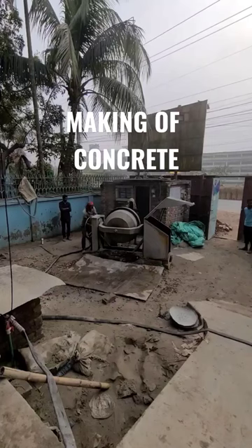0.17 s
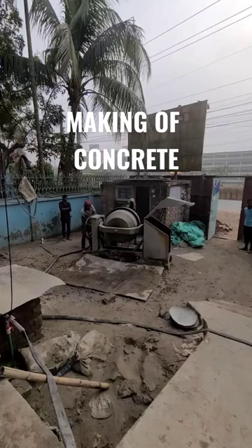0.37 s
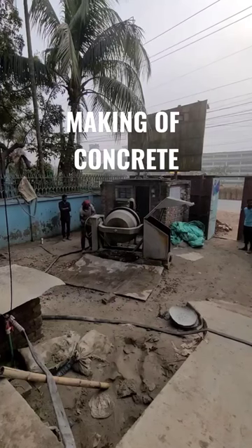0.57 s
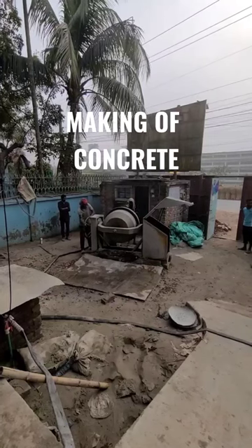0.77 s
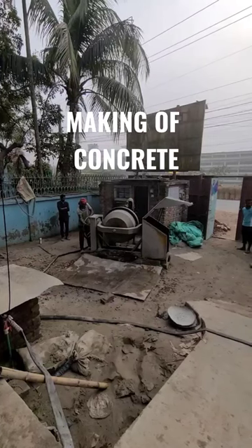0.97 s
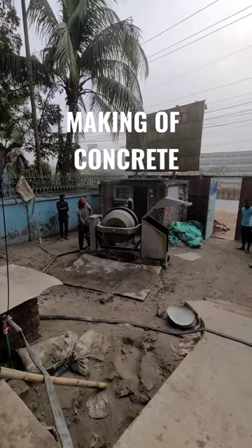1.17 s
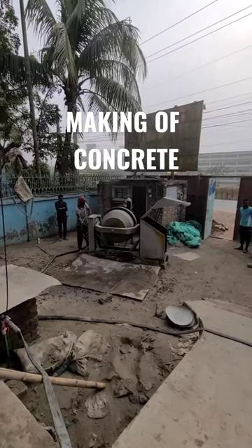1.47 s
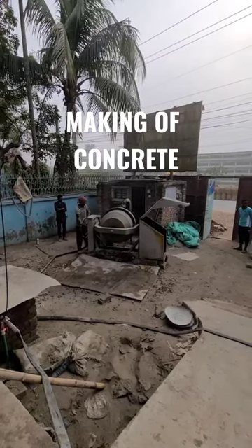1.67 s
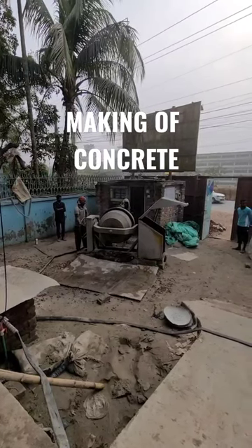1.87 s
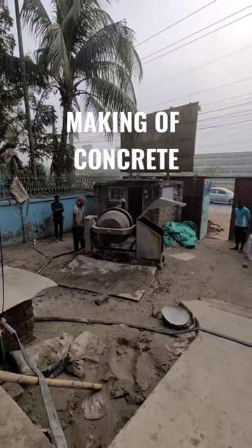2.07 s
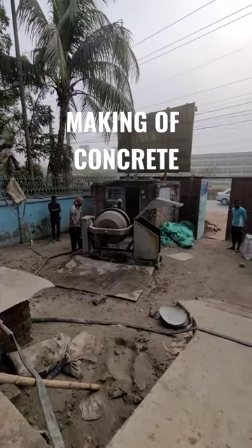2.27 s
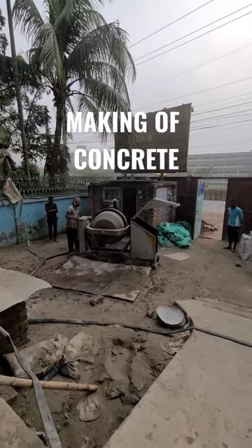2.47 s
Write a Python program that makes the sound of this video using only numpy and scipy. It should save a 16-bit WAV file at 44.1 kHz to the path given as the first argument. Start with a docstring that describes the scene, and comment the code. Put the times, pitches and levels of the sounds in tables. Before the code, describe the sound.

A drum concrete mixer rumbles and booms loudly, stones rattling and steel clanking over diesel hum

```python
"""A drum concrete mixer turns in an open yard: its wet load tumbles and makes the steel shell rumble and boom.
Filtered random impacts make the rumble, the rattle of stones and the hiss of sand; one wandering tone booms.
A slow single-cylinder diesel hums as a stack of unsteady tones. Clanks are noise ringing the modes of the steel,
and ticks of grit are short puffs of bright noise. Two close microphone ports pick it all up in stereo.
The sound starts abruptly after a short silence."""
import sys
import numpy as np
from scipy import signal
from scipy.fft import rfft, irfft, next_fast_len
from scipy.io import wavfile

SR = 44100
rng = np.random.default_rng(int(sys.argv[2]) if len(sys.argv) > 2 else 0)


def transcribe(signal):
    """Save signal, clipped to [-1, 1], as a 16-bit WAV file at the path in sys.argv[1]."""
    frames = np.atleast_2d(signal).T
    limited = np.clip(frames, -1, 1)
    pcm = np.round(limited * 32767).astype(np.int16)
    wavfile.write(sys.argv[1], SR, pcm)


N = 116424  # length in samples

# Engine tones that stand out. Each row: multiple of the engine cycle, average rms level in dB.
ENGINE_ORDERS = [(5, -38), (6, -27), (7, -28.5), (8, -33.5), (15, -31), (17, -27), (21, -34.5), (23, -28)]
# Strongest engine tone, 16 times the cycle. Each row: time in seconds, rms level in dB.
ENGINE_DRONE = [(0.18, -31), (0.34, -22.5), (0.79, -20.5), (0.92, -36), (1.08, -20), (1.43, -22),
                (1.5, -28.5), (1.9, -22), (1.96, -42), (2.33, -35), (2.43, -22.5), (2.64, -27.5)]
CYCLE_HZ = 11.63  # average engine cycles per second
ORDER_WAVER_DB, SPEED_WAVER = 2, 0.00398  # typical wavering: tone level in dB, speed as a share

# Low boom of the shell. Each row: time in seconds, rms level in dB.
BOOM_LEVEL = [(0.18, -17), (0.21, -35.5), (0.94, -20.5), (0.97, -37), (1.12, -20), (1.29, -35), (1.39, -28),
              (1.76, -33), (1.86, -16), (1.95, -33), (2.02, -25), (2.15, -26.5), (2.23, -14.5), (2.44, -33),
              (2.47, -24.5), (2.64, -27)]
BOOM_HZ, BOOM_WANDER = 137.5, 0.013  # average pitch; typical wander as a share of it

# Rumble of the tumbling load. Each row: time in seconds, level in dB before the trim,
# level of the upper part in dB (only its changes around the average count).
RUMBLE_LEVEL = [(0.18, -18.5, -5.5), (0.25, -17, -2), (0.27, -22, 2), (0.3, -16.5, -4), (0.55, -20.5, 0),
                (0.58, -28.5, 9.5), (0.62, -20, -2.5), (0.82, -24, 1), (0.84, -16.5, -6), (1.17, -24.5, 3),
                (1.41, -18.5, -2), (1.43, -23.5, 1.5), (1.66, -23.5, 1.5), (1.69, -17, -6.5),
                (1.78, -23, 2.5), (2.15, -21.5, -1.5), (2.19, -19, -3), (2.29, -26.5, 1.5),
                (2.56, -16, -5.5), (2.64, -21, 1.5)]
# Tone colour of the thuds. Each row: frequency in Hz, relative level in dB per Hz.
THUD_COLOUR = [(13, -52), (22, -22), (69, -6.5), (158, -7.5), (187, 0.5), (223, -11.5), (265, -8.5),
               (422, -10.5), (539, -24.5), (700, -25), (910, -35), (1540, -120)]
# Resonances of the drum shell. Each row: frequency in Hz, width in Hz, lift in dB over the plain thuds.
SHELL_MODES = [(78.5, 85, 4), (103, 10.2, 9), (198.5, 11, 5), (268, 16, -1), (298.6, 45, 6.5),
               (384.4, 28, 3.5), (424.7, 45, 9.5)]
RUMBLE_TRIM_DB, THUDS_PER_S = 4, 1500  # the rate is for each impact train
RUMBLE_SPLIT_HZ = (96, 290)  # the upper part's share grows from none to full between these

# Stones rattling in the drum. Each row: time in seconds, level in dB before the trim.
RATTLE_LEVEL = [(0.18, -22.5), (0.23, -24), (0.23, -22.5), (0.26, -23.5), (0.43, -22.5), (0.7, -23.5),
                (0.93, -24), (0.95, -24), (1.16, -26.5), (1.18, -22.5), (1.41, -23), (1.47, -27.5),
                (1.49, -22.5), (1.64, -26), (1.78, -19), (1.8, -23), (1.95, -25), (1.99, -21.5),
                (2.17, -23.5), (2.19, -19.5), (2.21, -24), (2.5, -23), (2.52, -30), (2.54, -20),
                (2.63, -22), (2.64, -33)]
# Treble of the rattle. Each row: time in seconds, level in dB (its changes against the rattle level count).
TREBLE_LEVEL = [(0.18, -34), (0.27, -32.5), (0.32, -32), (0.42, -30), (0.48, -38), (0.7, -35),
                (0.73, -39.5), (0.75, -33), (0.76, -34), (0.92, -31), (0.99, -37.5), (1.1, -34.5),
                (1.14, -40.5), (1.17, -33), (1.39, -35), (1.44, -35), (1.48, -33.5), (1.49, -31),
                (1.7, -36.5), (1.76, -30.5), (1.78, -34), (1.9, -37.5), (1.96, -33.5), (2.15, -38.5),
                (2.19, -31.5), (2.3, -38), (2.34, -36), (2.52, -35), (2.6, -31.5), (2.64, -31)]
# Tone colour of the stones. Each row: frequency in Hz, relative level in dB per Hz.
STONE_COLOUR = [(450, -20), (600, -3.5), (900, -4.5), (1300, -4), (1600, -10.5), (1950, -9), (2400, -14.5),
                (3050, -15.5), (3500, -19), (4500, -23), (6000, -26), (8500, -43)]
RATTLE_TRIM_DB, STONES_PER_S = 1.33, 4000  # the rate is for each impact train
RATTLE_SPLIT_HZ = (1220, 2600)  # the treble's share grows from none to full between these

# Sand hiss. Each row: time in seconds, level in dB.
HISS_LEVEL = [(0.18, -46), (0.3, -37.5), (0.54, -39.5), (0.6, -45.5), (0.64, -36), (0.91, -38.5),
              (1.04, -41.5), (1.08, -36.5), (1.11, -41.5), (1.39, -36.5), (1.47, -45), (1.49, -37),
              (1.7, -44), (1.72, -38), (1.75, -28.5), (1.8, -40), (1.84, -40.5), (2.02, -35), (2.12, -42),
              (2.16, -38.5), (2.52, -40.5), (2.64, -37)]
# Tone colour of the sand. Each row: frequency in Hz, relative level in dB per Hz.
SAND_COLOUR = [(6500, -7), (8000, -5), (10000, -0.5), (12000, 2), (14000, 1), (16500, 2)]
GRAINS_PER_S = 11000  # for each impact train

# Clanks on the steel. Each row: start in seconds, strength in dB before the trim, length in seconds,
# centre of the modes struck in Hz.
CLANK_BLOWS = [(0.224, -13.5, 0.04, 1350), (0.261, -14.5, 0.044, 3800), (.405, -16, .04, 2100),
               (0.452, -16, 0.053, 1100), (.566, -13, 0.024, 1050), (0.747, -17.5, 0.047, 4220),
               (.787, -14.5, 0.041, 2150), (0.877, -16, 0.093, 1520), (0.902, -16.5, 0.049, 3020),
               (1.48, -16.5, 0.08, 1880), (1.481, -14, 0.091, 4220), (1.497, -18, 0.041, 2000),
               (1.557, -20, 0.084, 3200), (1.581, -18, 0.032, 1500), (1.98, -26, 0.03, 1500),
               (2.16, -16.5, 0.057, 4040), (2.177, -20, 0.035, 1400), (2.568, -28, 0.032, 1100),
               (2.588, -16, .07, 4000)]
# Ringing modes of the steel. Each row: frequency in Hz, average relative level in dB,
# time to die by 60 dB in seconds.
STEEL_MODES = [(1050, -3.5, 0.076), (1364, 1, 0.038), (1753, -5, 0.037), (1921, -4, 0.037),
               (2095, -6, 0.04), (2450, -8.5, 0.066), (2820, -12, 0.0089), (3090, -9, 0.022),
               (3470, -18, 0.026), (3763, -16.5, 0.052), (4110, -17.5, .035), (4540, -17.5, .035),
               (4750, -19.5, 0.037)]
CLANK_TRIM_DB = -7.5
CLANK_FALL_DB_PER_OCTAVE = 16  # modes away from the centre are struck less
CLANK_HOLD_SHARE = 0.18  # part of its length that a clank keeps full strength
STEADY_BLOWS_DB = -12.5  # constant light knocking, against the untrimmed rattle level

# Sharp ticks of grit. Each row: start in seconds, starting level in dB before the trim.
GRIT_TICKS = [(0.3216, -48), (0.7236, -46), (0.7995, -39), (1.2774, -39), (1.4799, -32.5), (1.5727, -41),
              (1.6086, -41), (1.7104, -35), (1.8346, -35), (2.0436, -38), (2.1364, -40), (2.1733, -37),
              (2.565, -39)]
TICK_T60_S, TICK_TRIM_DB, TICK_LOW_HZ = 0.091, 5, 7900  # time to die by 60 dB; trim; bottom of the noise

# How alike left and right are. Each row: frequency in Hz, likeness (0 unrelated, 1 the same).
STEREO_LIKENESS = [(60, 0.96), (250, 1), (500, 0.83), (1000, 0.61), (2000, 0.76), (4000, 0.038),
                   (12000, 0.06)]
# Balance of the two ports. Each row: frequency in Hz, left minus right in dB.
PORT_BALANCE = [(100, -0.5), (380, -3), (700, 1.2), (1290, 0.9), (2380, -1.4), (4400, 0.4), (8120, 5),
                (13000, -2)]
RIGHT_LAG_S, CUTOFF_HZ = .00011, 15400
START_S, START_RISE_S = 0.1618, .0004
OVERLOAD = .97  # level that the rounded peaks approach, before the top cut


def from_db(db):
    """Turn decibels into a plain multiplier."""
    return 10 ** (np.asarray(db) / 20)


def rms_one(x):
    """Scale a sound so that its rms strength is 1."""
    return x / np.sqrt(np.mean(x ** 2) + 1e-20)


def in_time(rows, axis=1):
    """Join one column of a timed table with straight lines, giving a value at every sample."""
    table = np.array(rows)
    return np.interp(np.arange(N) / SR, table[:, 0], table[:, axis])


def at_hz(points, hz):
    """Read a table of frequency and value, with frequency on a log scale as in hearing."""
    table = np.array(points)
    return np.interp(np.log(np.maximum(hz, 1)), np.log(table[:, 0]), table[:, 1])


def drift(rate_hz):
    """Slow random wandering with an rms of 1: smoothed noise that moves faster at a higher rate."""
    step = 40  # samples between the slow points
    r = np.exp(-2 * np.pi * step * rate_hz / SR)
    noise = rng.standard_normal(N // step + 2002)
    slow = signal.lfilter([1], [1, -2 * r, r * r], noise)[2000:]  # drop the filter's settling
    return np.interp(np.arange(N) / step, np.arange(len(slow)), rms_one(slow))


def impacts(per_s, size_step_db):
    """Four unrelated trains of random clicks, as two stereo pairs: sizes vary at random, overall rms is 1."""
    shape = (2, 2, N)
    sizes = from_db(size_step_db * np.minimum(rng.exponential(1, shape), 4))
    signs = rng.choice([-1, 1], shape)
    hits = rng.random(shape) < per_s / SR
    return rms_one(sizes * signs * hits) + 1e-9


def spread(near, far, hz):
    """Make left and right from a shared part and an opposed part; their mix sets how alike the sides are."""
    alike = np.clip(at_hz(STEREO_LIKENESS, hz), 0, 1)
    return np.sqrt(1 + alike) * near + np.sqrt(1 - alike) * far * [[1], [-1]]


def banded(source, colour, patchy_db, flicker_hz, split_hz, upper_db):
    """Pass impacts through narrow bands, each with its own level, flicker and stereo width; rms is 1."""
    low_hz, high_hz = colour[0][0], min(colour[-1][0], .45 * SR)
    edges = np.geomspace(low_hz, high_hz, int(2.5 * np.log2(high_hz / low_hz)) + 2)
    out, together = 0, drift(flicker_hz)
    for k, (low, high) in enumerate(zip(edges, edges[1:])):
        band = signal.butter(2, [low, high], "band", fs=SR, output="sos")
        near, far = signal.sosfilt(band, source[k % 2])  # neighbouring bands use different pairs
        hz = np.sqrt(low * high)
        upper_share = at_hz([(split_hz[0], 0), (split_hz[1], 1)], hz)
        upper_change_db = upper_share * (upper_db - upper_db.mean())
        flicker_db = patchy_db * (0.32 * together + 1.3 * drift(flicker_hz))
        gain = from_db(at_hz(colour, hz) + upper_change_db + flicker_db)
        out = out + gain * spread(near, far, hz)
    return rms_one(out)


def engine():
    """The diesel's firing cycle makes tones at whole multiples of its slightly unsteady speed."""
    turns = np.cumsum(CYCLE_HZ * (1 + SPEED_WAVER * drift(1.42))) / SR
    orders = [(k, db + ORDER_WAVER_DB * drift(3.0)) for k, db in ENGINE_ORDERS]
    orders.append((16, in_time(ENGINE_DRONE)))
    hum = 0
    for k, db in orders:
        tone = np.sin(2 * np.pi * (k * turns + rng.random()))
        hum = hum + np.sqrt(2) * from_db(db) * tone
    return hum


def boom():
    """One low shell mode: a sine that swells and wanders a little in pitch."""
    turns = np.cumsum(BOOM_HZ * (1 + BOOM_WANDER * drift(3.7))) / SR
    return np.sqrt(2) * from_db(in_time(BOOM_LEVEL)) * np.sin(2 * np.pi * turns)


def rumble():
    """The load thuds down as many random impacts, and the shell lifts its own resonances."""
    upper_db = in_time(RUMBLE_LEVEL, axis=2)
    thuds = banded(impacts(THUDS_PER_S, 1.5), THUD_COLOUR, 0.81, 3.6, RUMBLE_SPLIT_HZ, upper_db)
    out = thuds
    for hz, width_hz, lift_db in SHELL_MODES:
        r = np.exp(-np.pi * width_hz / SR)
        top = np.array([1, 0, -1]) * (1 - r * r) / 2
        bottom = [1, -2 * r * np.cos(2 * np.pi * hz / SR), r * r]
        out = out + (from_db(lift_db) - 1) * signal.lfilter(top, bottom, thuds)
    return from_db(in_time(RUMBLE_LEVEL) + RUMBLE_TRIM_DB) * rms_one(out)


def rattle():
    """Stones knock in the drum: dense random impacts whose treble rises and falls on its own."""
    level_db = in_time(RATTLE_LEVEL)
    treble_db = in_time(TREBLE_LEVEL) - level_db
    stones = banded(impacts(STONES_PER_S, 1.5), STONE_COLOUR, 0.93, 7.5, RATTLE_SPLIT_HZ, treble_db)
    return from_db(level_db + RATTLE_TRIM_DB) * stones


def hiss():
    """Sand grains make impacts so dense and high that they blend into a flickering hiss."""
    no_change = np.zeros(N)
    grains = banded(impacts(GRAINS_PER_S, -1.5), SAND_COLOUR, 0.99, 32.0, RATTLE_SPLIT_HZ, no_change)
    return from_db(in_time(HISS_LEVEL)) * grains


def ring(x, hz, t60):
    """One damped mode: each push makes a sine at its pitch that dies by 60 dB in t60 seconds."""
    r, w = from_db(-60 / (t60 * SR)), 2 * np.pi * hz / SR
    return signal.lfilter([0, np.sin(w)], [1, -2 * r * np.cos(w), r * r], x + 1e-18)


def bursts(rows, hold_share=0):
    """Add up sudden starts, each held for a share of its length, then falling 20 dB per length."""
    t = np.arange(N) / SR
    level = 0
    for start, db, length in rows:
        falling_s = np.clip(t - start - hold_share * length, 0, 1)
        level = level + from_db(db - 20 * falling_s / max(length, .003)) * (t >= start)
    return level


def clanks():
    """Short showers of noisy blows ring the steel modes, over constant light knocking."""
    steady, out = from_db(in_time(RATTLE_LEVEL) + STEADY_BLOWS_DB), 0
    for hz, db, t60 in STEEL_MODES:
        rows = []
        for start, strength_db, length, centre_hz in CLANK_BLOWS:
            fall_db = CLANK_FALL_DB_PER_OCTAVE * abs(np.log2(hz / centre_hz))
            rows.append((start, strength_db + CLANK_TRIM_DB - fall_db, length))
        blows = steady + bursts(rows, CLANK_HOLD_SHARE)
        near, far = rng.standard_normal((2, N)) * blows * from_db(db + 2.5 * drift(13.0))
        ringing = spread(ring(near, hz, t60), ring(far, hz, t60), hz)
        out = out + ringing / np.sqrt(t60 * SR / 14)  # long rings build up more, so even them out
    return out


def ticks():
    """Grit ticks are puffs of high noise that start at once and die fast, unrelated left and right."""
    high_pass = signal.butter(4, TICK_LOW_HZ, "high", fs=SR, output="sos")
    noise = signal.sosfilt(high_pass, rng.standard_normal((2, N)))
    return noise * bursts([(start, db + TICK_TRIM_DB, TICK_T60_S / 3) for start, db in GRIT_TICKS])


def scene():
    """Add all parts of the mixer together."""
    return engine() + boom() + rumble() + rattle() + hiss() + clanks() + ticks()


def record(dry):
    """Unequal ports a little apart, a sudden start, the highest peaks rounded, a steep cut at the top."""
    size = next_fast_len(N + 4096)
    hz = np.arange(size // 2 + 1) * SR / size
    tilt = from_db(at_hz(PORT_BALANCE, hz) / 2)  # half the difference goes to each side
    right_delay = np.exp(-2j * np.pi * hz * RIGHT_LAG_S)
    ports = np.array([tilt, right_delay / tilt])
    heard = irfft(rfft(dry, size) * ports, size)[:, :N]
    started = heard * np.clip((np.arange(N) / SR - START_S) / START_RISE_S, 0, 1)
    rounded = started / (1 + (started / OVERLOAD) ** 6) ** (1 / 6)
    top_cut = signal.ellip(12, .5, 70, CUTOFF_HZ, fs=SR, output="sos")
    return signal.sosfilt(top_cut, rounded)


dry = scene()
out = record(dry)
transcribe(out)
```